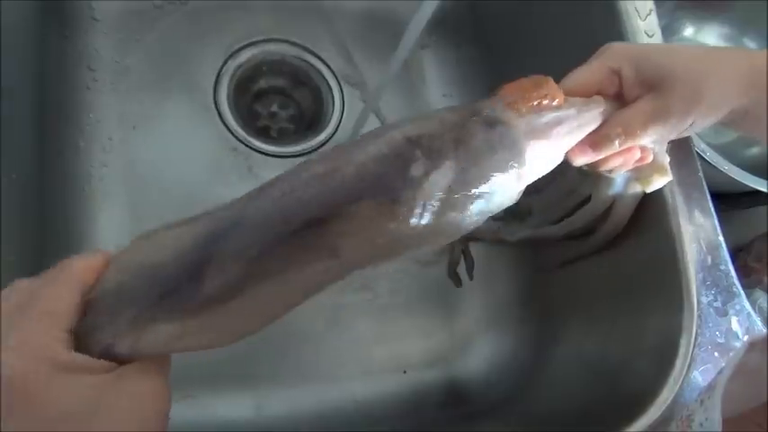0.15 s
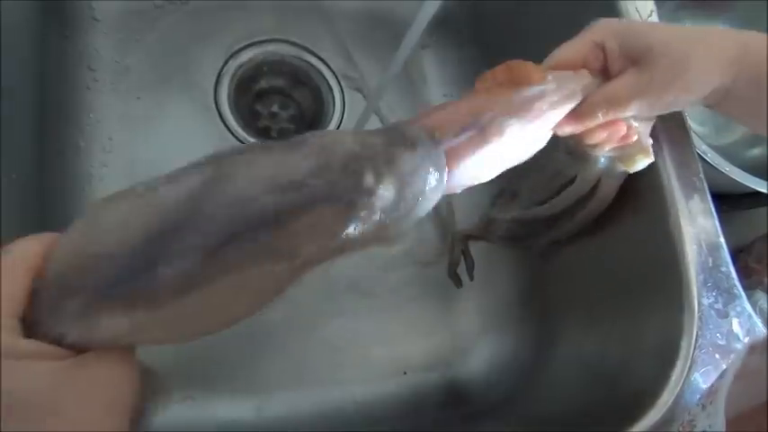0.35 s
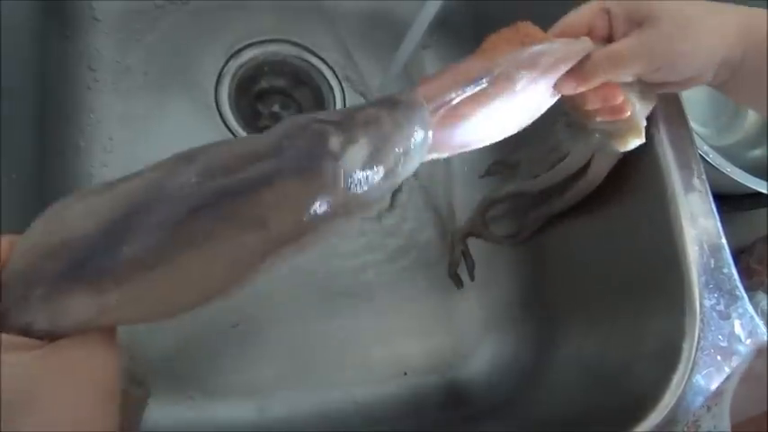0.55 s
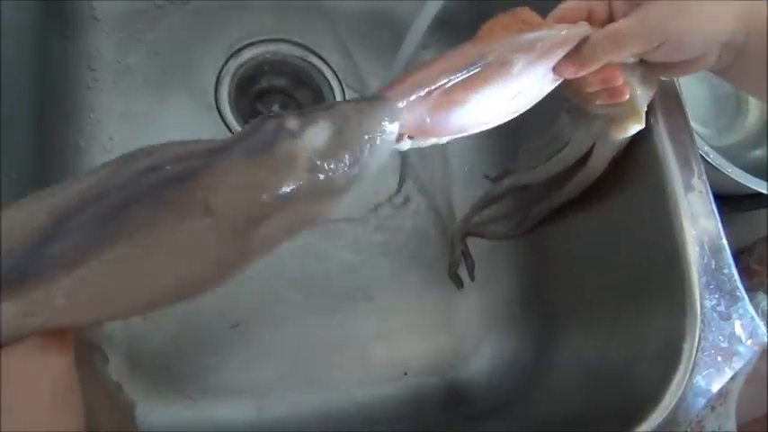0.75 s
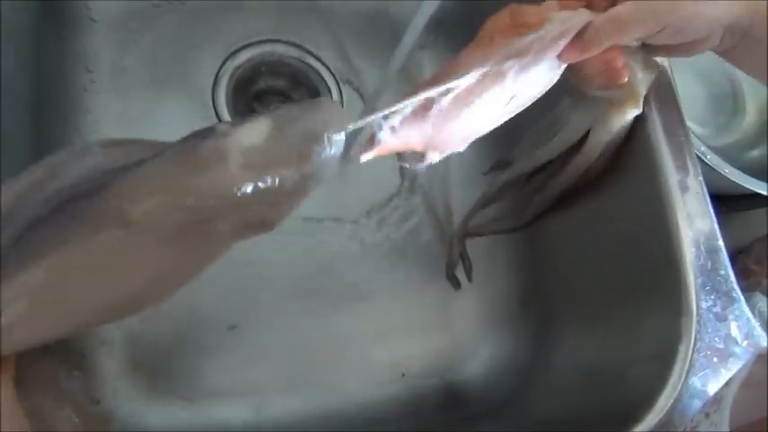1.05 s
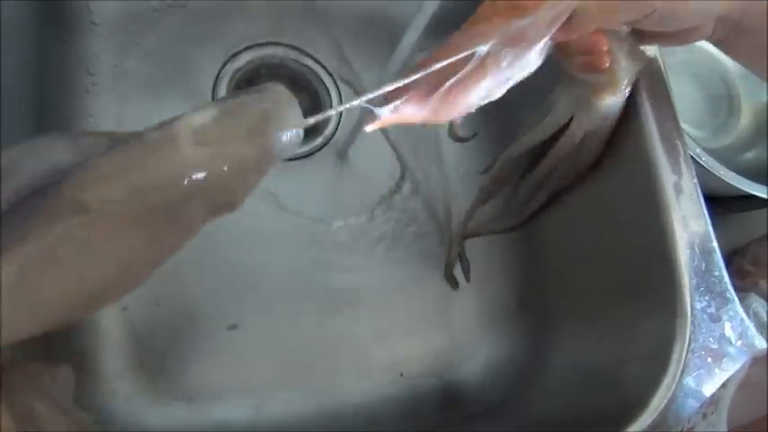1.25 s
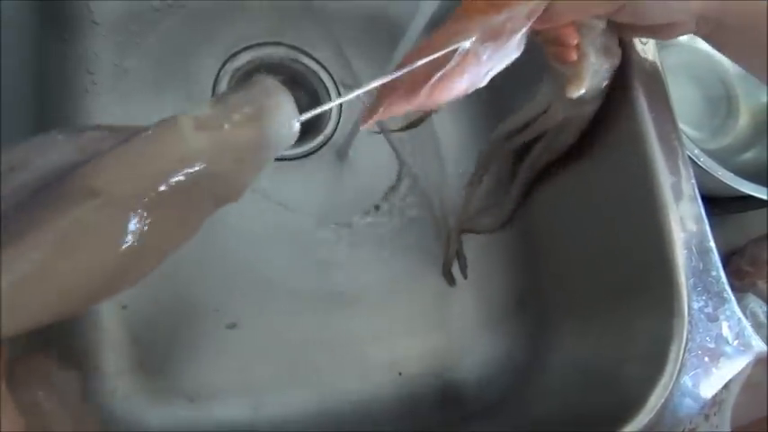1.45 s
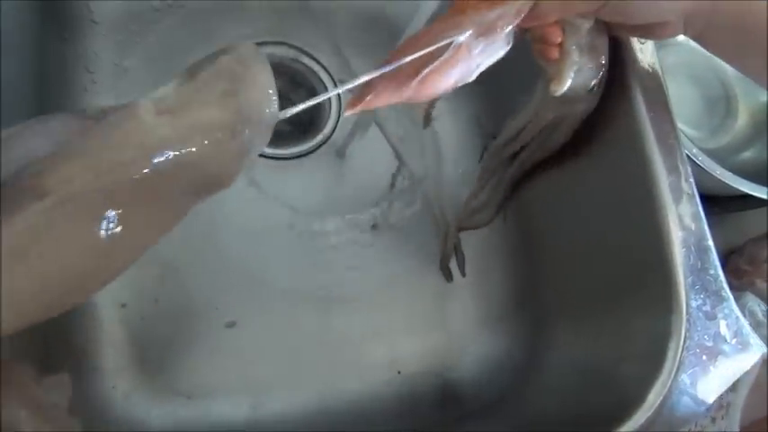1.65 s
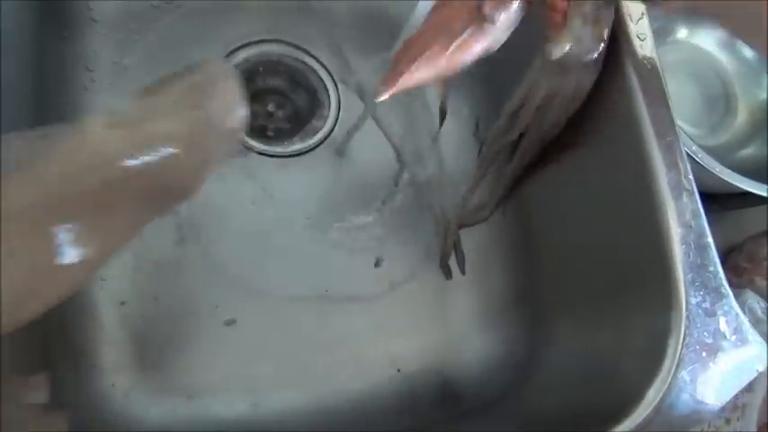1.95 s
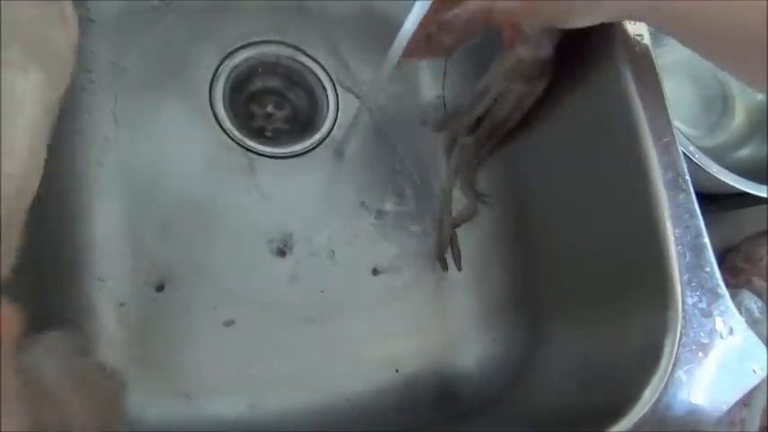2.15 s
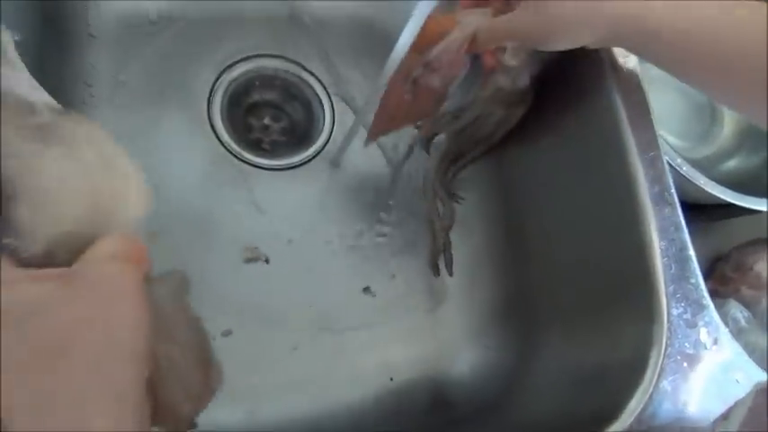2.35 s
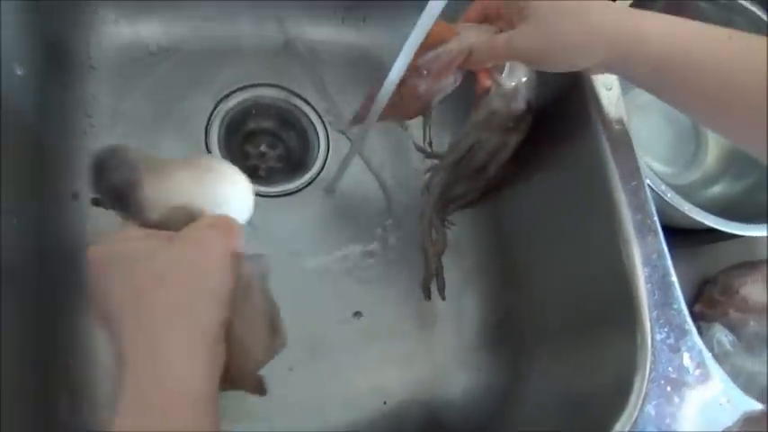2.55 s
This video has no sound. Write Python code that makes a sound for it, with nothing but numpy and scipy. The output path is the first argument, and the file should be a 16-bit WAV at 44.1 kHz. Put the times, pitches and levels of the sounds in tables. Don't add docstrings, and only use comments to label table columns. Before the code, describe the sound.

Running tap water breaking into drops patters in a metal sink, with small bright plops and faint knocks.

```python
import sys
import numpy as np
from scipy import signal
from scipy.fft import rfft, irfft, next_fast_len
from scipy.io import wavfile
from scipy.ndimage import uniform_filter1d, map_coordinates

SR = 44100
rng = np.random.default_rng(int(sys.argv[2]) if len(sys.argv) > 2 else 0)


def master(y):
    cut = np.clip(np.atleast_2d(y).T, -1, 1)
    pcm = np.round(cut * 32767)
    wavfile.write(sys.argv[1], SR, pcm.astype(np.int16))


def decibels_to_gain(level_db):
    exponent = np.asarray(level_db, float) / 20
    return 10 ** exponent


N = 119070


def unit(x):
    return x / np.sqrt(np.mean(x ** 2) + 1e-20)


def noise():
    return rng.standard_normal(N)


def along(points, hz):
    point_hz, value = np.transpose(points)
    return np.interp(np.log(hz + 1), np.log(point_hz + 1), value)


def wobble(rate_hz):
    return map_coordinates(rng.standard_normal(N // 40), [np.arange(N) * rate_hz / SR])


def filtered(x, response):
    m = next_fast_len(N + 8192)
    return irfft(rfft(x, m) * response(np.fft.rfftfreq(m, 1 / SR)), m)[..., :N]


def rings(modes, f):
    response = 1
    for pitch, width, lift_db in modes:
        response = response + (decibels_to_gain(lift_db) - 1) * 1j * f * width / (pitch ** 2 - f * f + 1j * f * width)
    return response


def coloured(x, spectrum, modes):
    m = next_fast_len(N + 8192)
    z, f = rfft(x, m), np.fft.rfftfreq(m, 1 / SR)
    broad = np.sqrt(np.abs(uniform_filter1d(np.abs(z) ** 2, size=2001)) + 1e-12)
    return unit(irfft(z / broad * decibels_to_gain(along(spectrum, f)) * rings(modes, f), m)[:N])


def patchy(x, depth_db):
    z = signal.stft(x, nperseg=256)[2]
    field = uniform_filter1d(rng.standard_normal(z.shape), size=9, axis=0)
    field = uniform_filter1d(field, size=25, axis=1)
    return unit(signal.istft(z * decibels_to_gain(depth_db * unit(field)), nperseg=256)[1][:N])


def bubbles(start_s, gain, hz, cycles, length):
    t = np.arange(length) / SR
    life = (cycles / hz)[:, None]
    tone = np.sin(2 * np.pi * hz[:, None] * t * (1 + 0.076 * t / life))
    wave = gain[:, None] * tone * np.exp(-t / life) * (1 - np.exp(-4 * t / life))
    at = np.round(start_s * SR).astype(int)[:, None] + np.arange(length)
    return np.bincount(at.ravel(), wave.ravel(), N + length + 1)[:N]


def drops(density_db, count, mid_hz, spread, cycles, size_db, length):
    u = rng.random((count, 4))
    share = np.cumsum(decibels_to_gain(density_db))
    start_s = np.interp(u[:, 0], share / share[-1], np.arange(N) / SR)
    hz = np.clip(mid_hz * np.exp(spread * (2 * u[:, 1] - 1)), 200, 17000)
    gain = decibels_to_gain(-size_db * np.log(u[:, 2] + 0.00068))
    return unit(bubbles(start_s, gain, hz, cycles * (.5 + u[:, 3]), length))


def splashes(density_db, count, decays_s, size_db):
    u = rng.random((count, 2))
    share = np.cumsum(decibels_to_gain(density_db))
    turn = (np.arange(count) + 1.1 * u[:, 0]) / (count + 1)
    at = np.interp(turn, share / share[-1], np.arange(N)).astype(int)
    hits, t = np.bincount(at, decibels_to_gain(size_db * u[:, 1]), N), np.arange(1500) / SR
    shapes = [np.exp(-t / decay) * (1 - np.exp(-t / .0002)) for decay in decays_s]
    return [unit(signal.fftconvolve(hits, shape)[:N]) for shape in shapes]


def landing():
    wash, tick = splashes(1.5 * wobble(40), count=180, decays_s=[.006, 0.00063], size_db=9)
    clump_db = 5 * np.log(.35 + wash)
    spit, = splashes(clump_db, count=800, decays_s=[0.001], size_db=12)
    return clump_db, tick, spit


# pitch_hz, width_hz, lift_db
BOWL_MODES = [(2576, 600, 9), (2962, 70, 13), (3294, 77, 8.5), (4080, 350, 7), (6020, 155, 4.5),
              (7270, 130, 2.5), (9350, 230, 4), (11490, 134, 7)]
# pitch_hz, level_db (per Hz)
SPRAY_SPECTRUM = [(1500, -49), (2650, -25), (4500, -17), (6640, -3.5), (7570, 0), (9340, 0.5),
                  (13500, -6.5), (15800, -10.5)]


def spray(clump_db, tick, spit):
    fine = drops(clump_db, count=2500, mid_hz=10050, spread=0.72, cycles=2.3, size_db=2.5, length=100)
    mix = spit * noise() + decibels_to_gain(-5) * fine + decibels_to_gain(-13.5) * tick * noise()
    mix = mix + decibels_to_gain(-3 + 0.38 * clump_db) * noise()
    return coloured(mix, SPRAY_SPECTRUM, BOWL_MODES)


# pitch_hz, level_db (per Hz)
POOL_SPECTRUM = [(530, -53), (900, -17.5), (2070, -10), (2980, -9.5), (3650, -7.5), (4000, -1.5),
                 (4520, -10), (5500, 5), (7150, -36), (12100, -120)]


def pool(clump_db, tick, spit):
    small = drops(2.7 * clump_db, count=500, mid_hz=3185, spread=0.397, cycles=3.2, size_db=0.16, length=200)
    mix = tick * noise() + small + decibels_to_gain(-2) * spit * noise()
    mix = mix + decibels_to_gain(1.5 + 0.84 * clump_db) * noise()
    return coloured(mix, POOL_SPECTRUM, BOWL_MODES)


# pitch_hz, level_db (per Hz)
BASIN_SPECTRUM = [(25, -21), (60, -10), (107, 0.5), (358, -3.5), (500, -5), (600, -9.5), (1700, -6.5),
                  (3500, -34)]
# pitch_hz, width_hz, lift_db
FLOOR_MODES = [(97.5, 13, 8.5), (119.3, 7.7, 8.5), (197, 17, 7), (269, 30, 8.5), (323, 24, 10),
               (421, 44, 7.5), (495, 20, 5.5)]


def basin(clump_db):
    drumming = coloured(decibels_to_gain(0.28 * clump_db) * noise(), BASIN_SPECTRUM, FLOOR_MODES)
    return drumming * decibels_to_gain(0.92 * wobble(15))


# start_s, spray_db, pool_db (over spray), basin_db (over spray)
FLOW = [(.05, -28, -10, -21.5), (.22, -25.5, -11.5, -27), (.3, -25.5, -14.5, -23.5),
        (.54, -25.5, -10.5, -24), (.6, -26, -13, -27.5), (.75, -26, -11, -25), (.98, -25, -8.5, -27),
        (1.05, -28, -11.5, -26), (1.42, -26.5, -8.5, -25.5), (1.64, -25, -9.5, -28),
        (1.75, -25, -17, -23.5), (1.81, -29, -11.5, -26.5), (2.112, -27.5, -10, -23), (2.14, -28, -28, -24),
        (2.17, -29.5, -9, -22.5), (2.42, -25, -14, -27), (2.64, -27, -13, -24.5), (2.7, -29.5, -10, -26)]


def water():
    start_s, *levels = np.transpose(FLOW)
    flow_db, pool_db, basin_db = [np.interp(np.arange(N) / SR, start_s, level) for level in levels]
    clump_db, tick, spit = landing()
    fizz = spray(clump_db, tick, spit)
    pooled = pool(clump_db, tick, spit)
    drumming = decibels_to_gain(basin_db) * basin(clump_db)
    fizz = patchy(fizz, depth_db=1.1)
    pooled = decibels_to_gain(pool_db - 2.0) * patchy(pooled, depth_db=1.5)
    return decibels_to_gain(flow_db) * (fizz + pooled + drumming)


# start_s, level_db (peak), pitch_hz
BIG_DROPS = [(0.0444, -25, 4100), (0.1811, -26, 4160), (0.2569, -28, 4090), (0.4869, -26, 4090),
             (0.7243, -24, 3950), (0.7428, -23, 4070), (0.7672, -27, 4090), (0.8845, -26, 4070),
             (0.8989, -18, 3870), (0.9388, -23, 3880), (0.9872, -24, 3870), (1.0211, -25, 3880),
             (1.0566, -24, 3940), (1.2626, -26, 4080), (1.291, -27, 4090), (1.3469, -25, 4080),
             (1.4711, -27, 4080), (1.508, -29, 4800), (1.5514, -24, 3930), (1.5749, -23, 4170),
             (1.6198, -23, 4030), (1.6422, -20, 4070), (1.9715, -26, 4080), (2.1715, -27, 4100),
             (2.2114, -27, 4010), (2.2788, -24, 4230), (2.4883, -31, 4120), (2.5162, -34, 4220),
             (2.5297, -28, 4230), (2.5921, -28, 4320),
             (0.1382, -25, 3210), (0.2554, -21, 3430), (0.3093, -30, 2650), (0.3961, -25, 2750),
             (0.4609, -29, 3240), (0.4849, -26, 3460), (0.5303, -24, 2970), (0.6161, -28, 3000),
             (0.7223, -24, 3290), (0.7418, -22, 2960), (0.7657, -25, 3030), (0.8016, -26, 2590),
             (0.882, -23, 2660), (0.9448, -23, 2970), (0.9857, -24, 2610), (1.0561, -28, 2970),
             (1.288, -28, 3240), (1.3594, -24, 3200), (1.4706, -24, 3000), (1.532, -27, 3220),
             (1.5499, -26, 2940), (1.6263, -22, 3010), (1.7929, -32, 2630), (1.8662, -28, 3000),
             (2.0772, -26, 2950), (2.1002, -28, 2950), (2.2109, -29, 3480), (2.3062, -27, 2880),
             (2.6235, -31, 2660), (2.6599, -27, 2690)]


def plops():
    start_s, level_db, hz = np.transpose(BIG_DROPS)
    u = rng.random((len(start_s), 3))
    bubble = bubbles(start_s, decibels_to_gain(level_db + 6), hz, 2.4 + u[:, 0], length=400)
    partner_s, partner_hz = start_s + .002 + .005 * u[:, 1], hz * (.85 + .3 * u[:, 2])
    partner = bubbles(partner_s, decibels_to_gain(level_db - 3), partner_hz, 1.5 + u[:, 1], length=400)

    def bowl(f):
        highpass = f ** 6 / (f ** 6 + 1900 ** 6)
        return np.sqrt(rings(BOWL_MODES, f)) * highpass * decibels_to_gain(-3)

    return filtered(bubble + partner, bowl)


# start_s, level_db (peak), pitch_hz
THUDS = [
    (0.275, -38.5, 504),
    (0.289, -34, 486),
    (0.321, -39, 231),
    (0.419, -56, 315),
    (0.52, -43, 243),
    (0.838, -44, 158),
    (1.258, -40, 327),
    (1.448, -32, 208.6),
    (1.749, -41.5, 328),
]


def thuds():
    start_s, level_db, hz = np.transpose(THUDS)
    return bubbles(start_s, decibels_to_gain(level_db - 7.5), hz, np.full(len(start_s), 5.2), length=4000)


def walls(dry):
    tail = rng.standard_normal(1500) * decibels_to_gain(-60 * np.arange(1500) / SR / 0.015)
    return decibels_to_gain(-14) * signal.fftconvolve(dry, tail / np.linalg.norm(tail))[:N]


# pitch_hz, level_db
WIDTH = [(25, -11), (80, -21), (400, -19), (800, -34), (5300, -38), (6000, -17), (10600, -17), (11600, -36)]
# pitch_hz, level_db
LEAN = [(30, .6), (90, 3.5), (200, 3.4), (340, .8), (600, 0)]


def two_ports(mid):
    shimmer = np.roll(mid, 40) * wobble(400)
    high = filtered(shimmer, lambda f: decibels_to_gain(along(WIDTH, f)) * (f > 1000))
    low = filtered(np.roll(mid, 9000), lambda f: decibels_to_gain(along(WIDTH, f)) * (f <= 1000))
    side = high + low
    halves = np.array([[.5], [-.5]])
    return filtered(np.array([mid + side, mid - side]), lambda f: decibels_to_gain(along(LEAN, f) * halves))


def scene():
    dry = water() + plops() + thuds()
    return two_ports(dry + walls(dry))


def roll_off(x):
    return signal.sosfilt(signal.butter(12, 17020, fs=SR, output="sos"), x)


def record(dry):
    start_s, ceiling, top_hz = .0365, .33, 15830
    gate = np.clip((np.arange(N) / SR - start_s) / 0.001, 0, 1)
    soft = dry / (1 + np.abs(dry / ceiling) ** 4) ** (1 / 4)
    mix = gate * filtered(soft, lambda f: f < top_hz)
    return roll_off(mix)


dry = scene()
out = record(dry)
master(out)
```